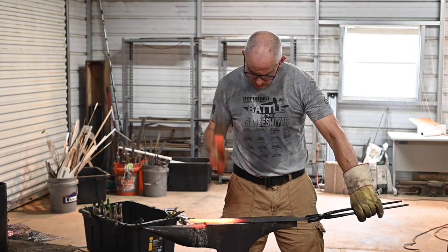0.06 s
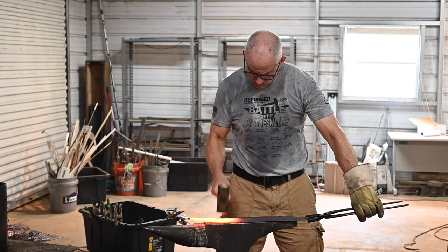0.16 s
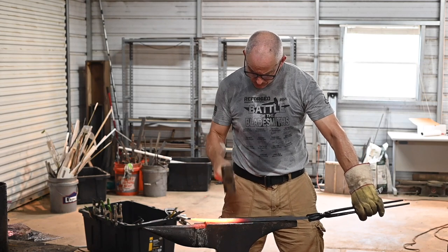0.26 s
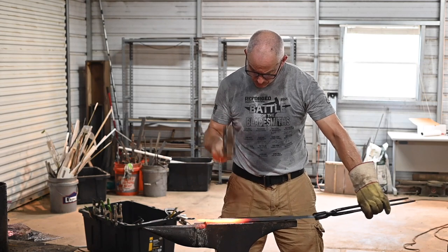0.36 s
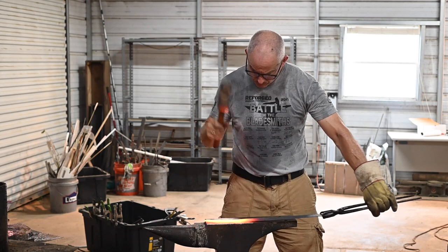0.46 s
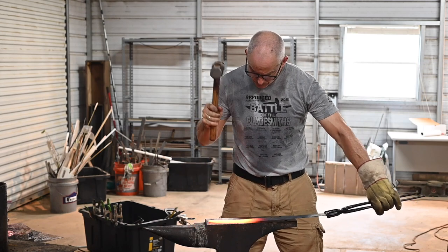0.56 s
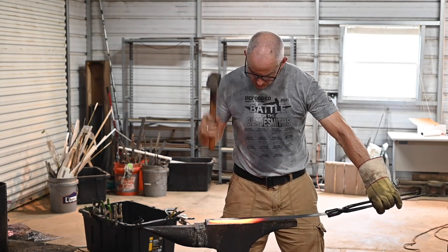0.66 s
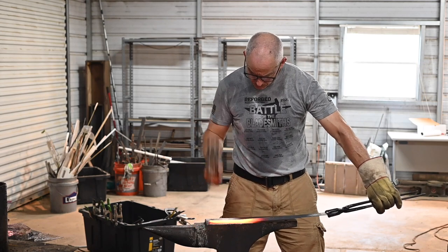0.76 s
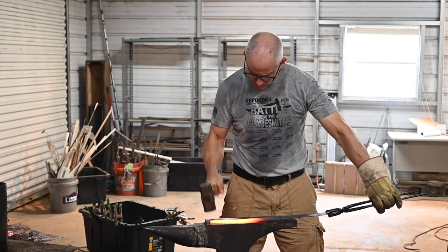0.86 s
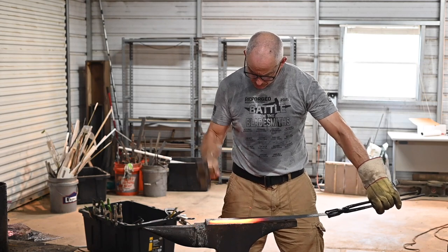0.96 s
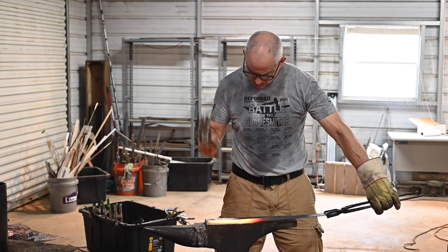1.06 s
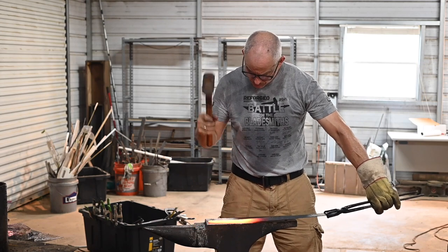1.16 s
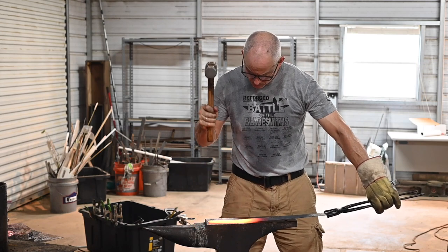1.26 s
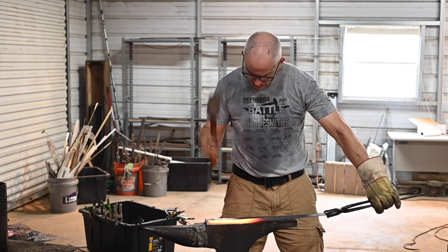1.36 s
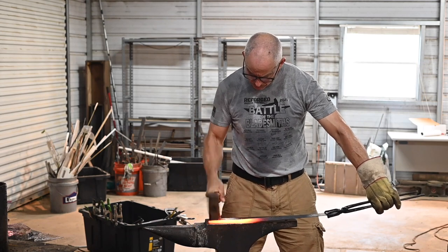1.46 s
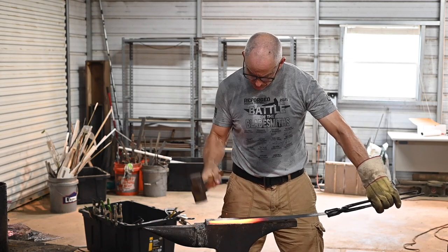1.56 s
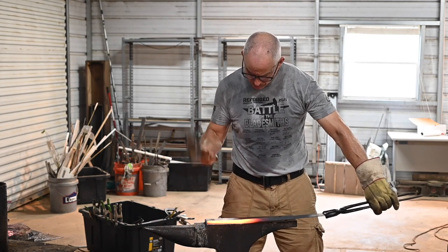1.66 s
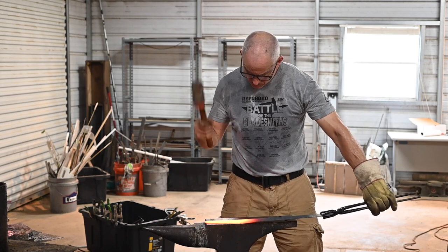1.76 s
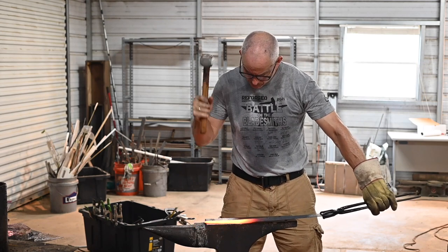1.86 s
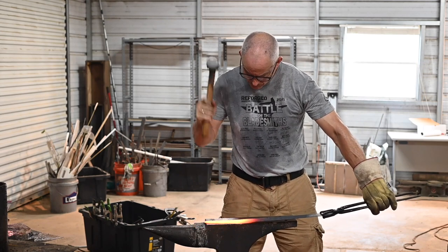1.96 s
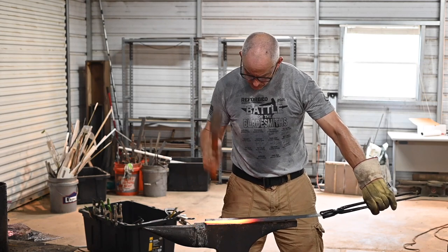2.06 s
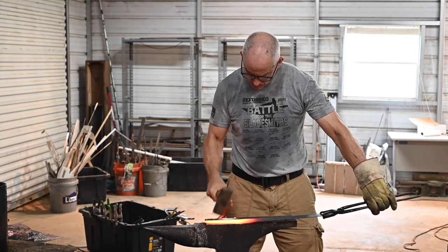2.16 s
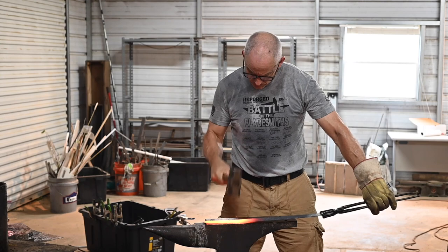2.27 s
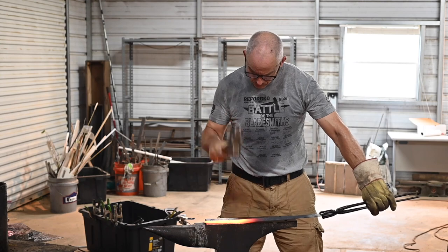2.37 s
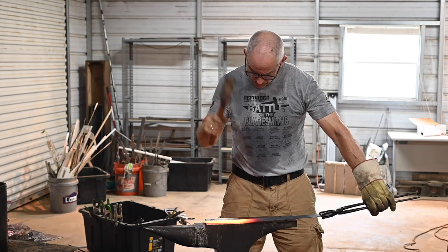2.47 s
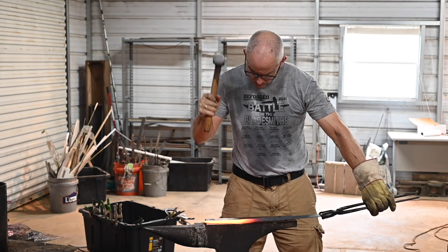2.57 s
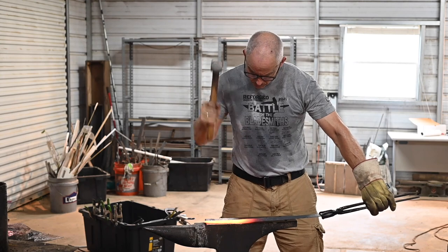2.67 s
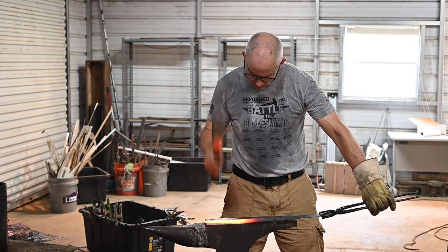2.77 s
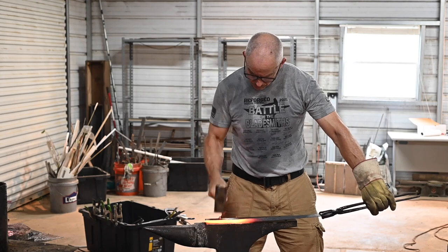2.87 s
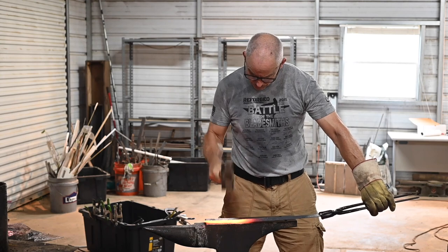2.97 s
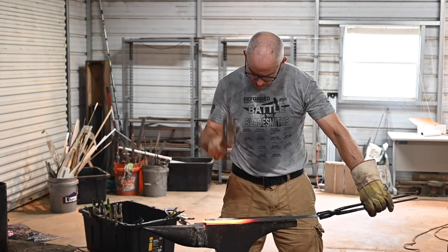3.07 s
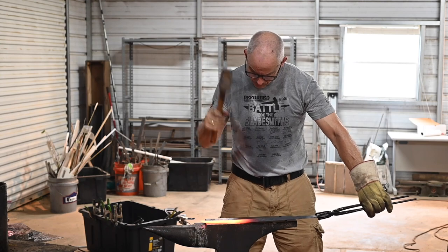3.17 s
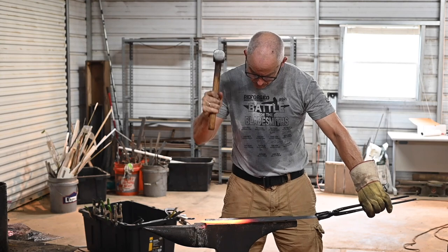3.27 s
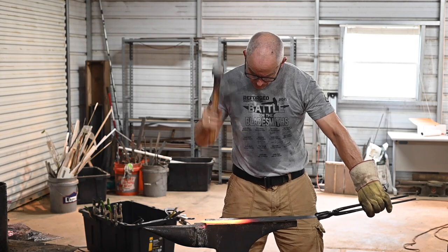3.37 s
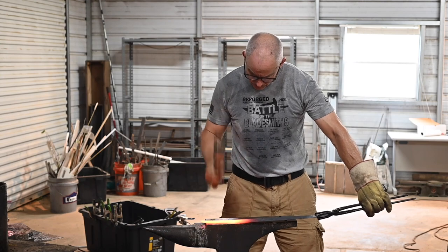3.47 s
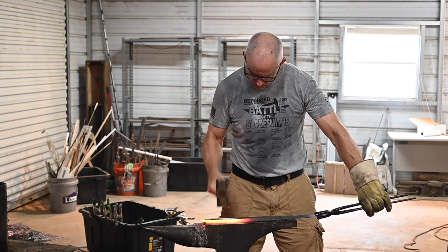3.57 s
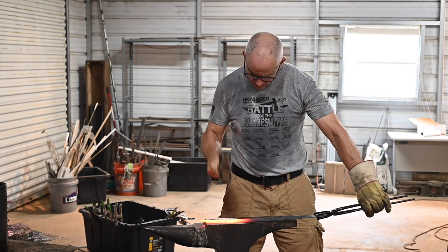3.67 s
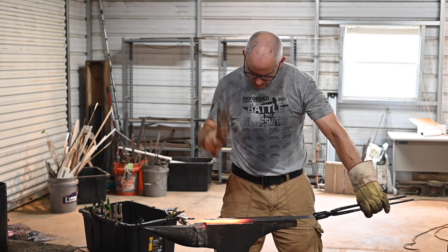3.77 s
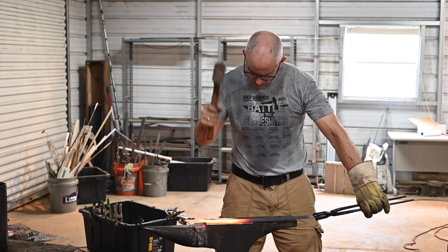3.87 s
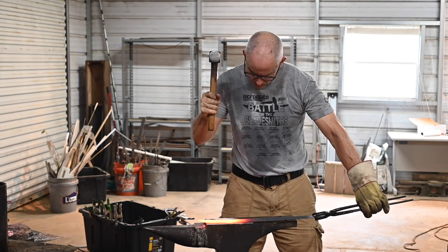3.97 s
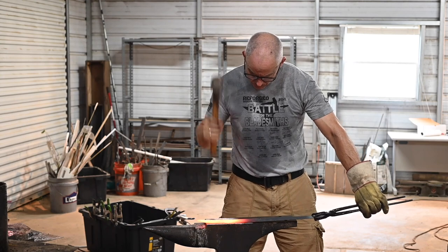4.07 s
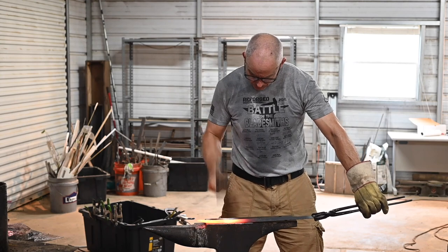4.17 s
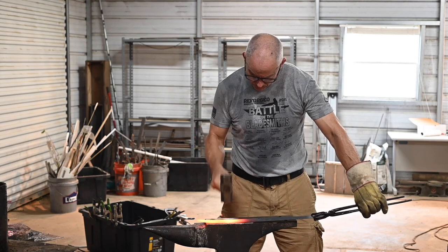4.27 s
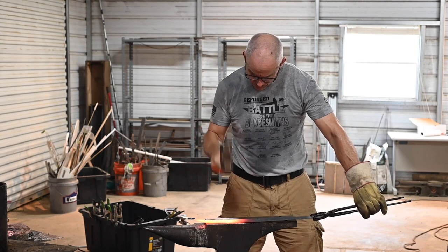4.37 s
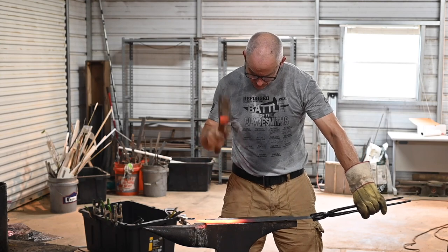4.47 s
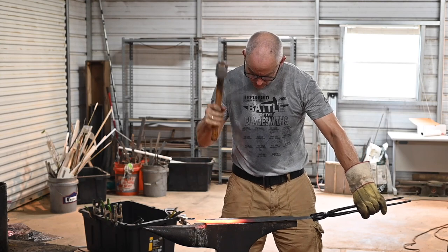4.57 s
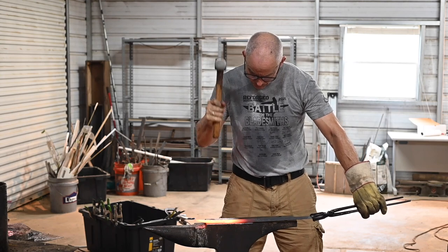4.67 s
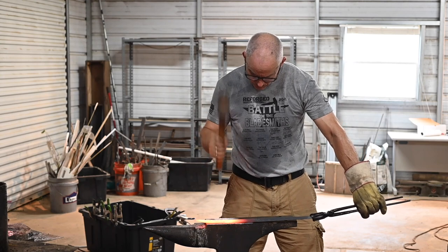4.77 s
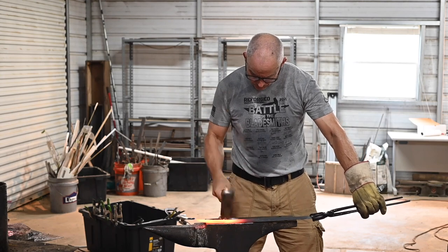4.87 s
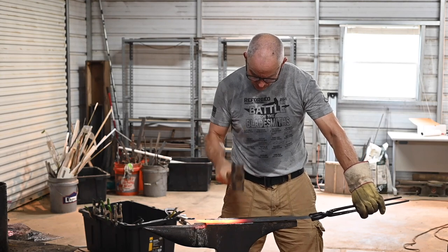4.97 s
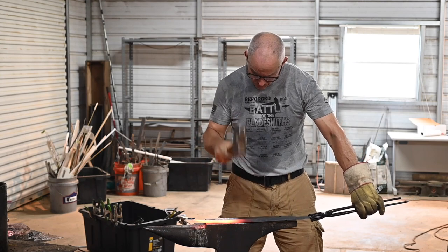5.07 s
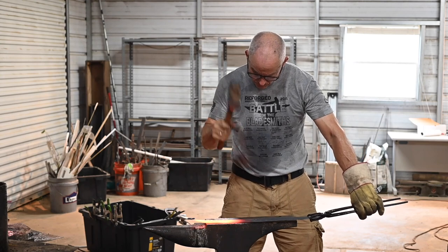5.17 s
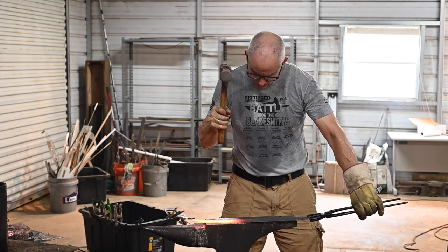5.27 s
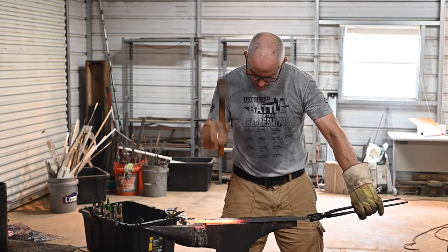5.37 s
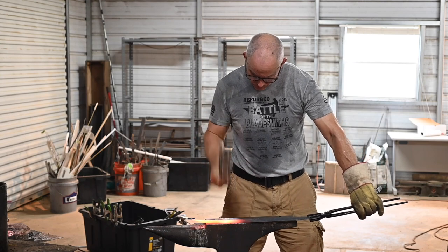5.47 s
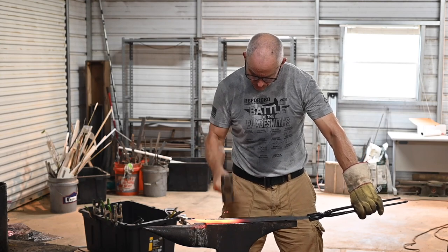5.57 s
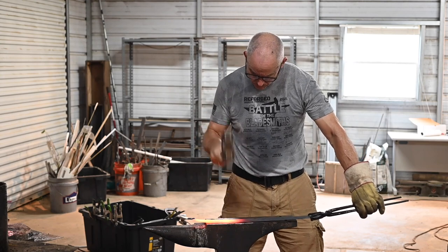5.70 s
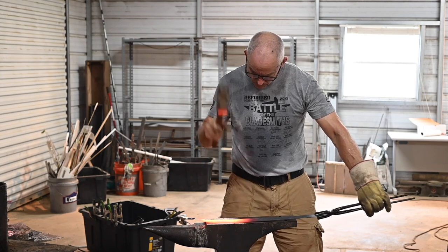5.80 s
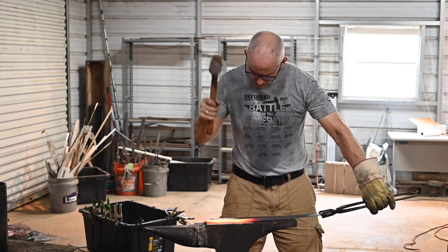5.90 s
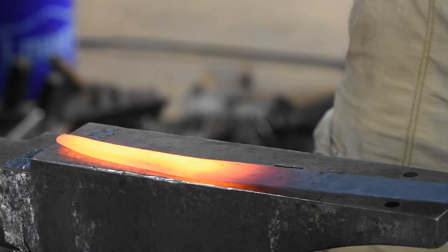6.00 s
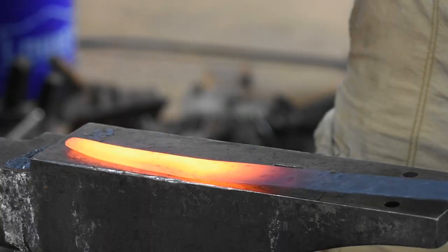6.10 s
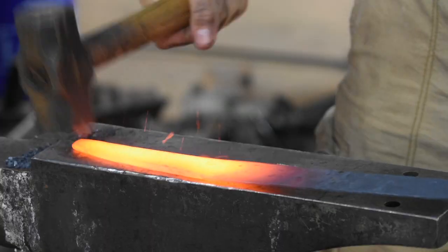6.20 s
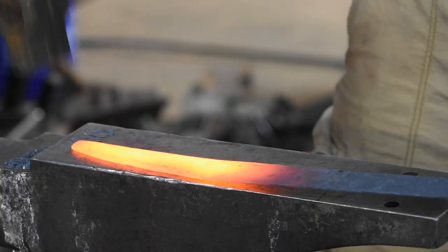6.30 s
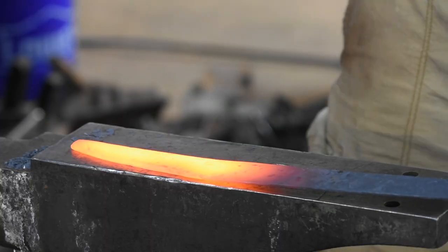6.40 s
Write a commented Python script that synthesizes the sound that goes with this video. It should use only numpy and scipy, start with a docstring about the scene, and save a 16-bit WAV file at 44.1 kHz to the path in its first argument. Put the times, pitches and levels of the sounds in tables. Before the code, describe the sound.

The ring of an earlier blow is already sounding over a soft, low forge rush. Then ten regular hammer blows fall on steel over an anvil, each snapping sharply, thudding briefly and singing on with a wavering bright ring. Metal walls throw back strong early echoes and a long wash. Each new blow chokes the previous note; close, wide stereo pickup, and the final blow is harder.

```python
"""A hand hammer draws out a hot blade on an anvil in a sheet-metal workshop, three blows every two seconds.
A forge rushes low and steady throughout (shaped noise); at first an earlier blow is still ringing.
Each blow: a dry crack (pulse, snap, noise bursts), then a thud of the stand (damped sines).
The anvil sings on, one clear note under many overtones (beating tones), in a long bright wash (decaying noise).
The next blow chokes that ring."""
import sys
import numpy as np
from scipy import signal
from scipy.fft import rfft, irfft, next_fast_len
from scipy.io import wavfile

SR = 44100
rng = np.random.default_rng(int(sys.argv[2]) if len(sys.argv) > 2 else 0)


def file_out(sig):
    """Save sig as 16-bit WAV at sys.argv[1]."""
    # one column per channel
    cols = np.atleast_2d(sig).T
    # limit, then scale
    lim = np.clip(cols, -1, 1)
    pcm = np.round(lim * 32767).astype(np.int16)
    wavfile.write(sys.argv[1], SR, pcm)


N = 283983

# hammer blows, levels re a usual blow: t/s, force/dB, face ping/dB, main note/dB, brightness/dB,
# first twin/dB, second twin/dB
BLOWS = [ (-0.48, 5.5, 0, 3, 1, 1, 4), (0.1883, 0.5, 4, -0.1, 2.1, 5, 4),
         (0.865, 1.5, -18, -0.4, 0, 2.5, 0), (1.5196, 0, -15, 1.3, 1.4, -1, -8),
         (2.1904, 0.5, -8, -2.8, -2.7, -1, -6), (2.8881, 0.5, -5, -0.6, -2.4, 3, 0),
         (3.5675, 0.8, 4, 0.6, -2, -2, -4), (4.2476, 0.7, 6, 0.6, -0.2, -4, 8.5),
         (4.9196, -0.5, 5, 0.4, 1.7, 2, 8.5), (5.5686, -2, 0, 0, 1.8, 0, 10),
         (6.2534, 4, -18, 1.2, -2.8, -2, -3)]
# usual blow: crack, low and high echoes, low overtones
CRACK_DB, KNOCK_DB, CLASH_DB, LOW_RING_DB = -8, 0.5, -0.35, 2.5
KNOCK_DB_PER_DB, CLASH_DB_PER_DB, LOW_RING_DB_PER_DB = 1, 0.086, 0.25  # growth with force

# forge rush: f/Hz, level/dB per Hz
FORGE_SPECTRUM = [(25, -100), (60, -76.5), (120, -71), (220, -66.5), (450, -76), (800, -74), (1150, -79.5),
                  (2000, -71), (5000, -85.5), (9000, -100), (14000, -120)]
# wall echoes before colouring and decay: f/Hz, level/dB per Hz
WASH_SPECTRUM = [(30, -88), (90, -60), (200, -61.5), (450, -70), (800, -63), (1150, -70.5), (1650, -61),
                 (2750, -71.5), (3600, -67.5), (4500, -75), (6000, -71.5), (9000, -73.5), (12000, -76.5),
                 (16000, -68)]
# room decay: f/Hz, t60/s
ROOM_T60 = [(80, 1.06), (250, 1.47), (800, 1.53), (2000, 3.4), (5000, 2.8), (8000, 1.9), (11000, 1),
            (15000, 0.44)]
# damped blade modes that colour the wash: f/Hz, width/Hz, level/dB
BLADE_MODES = [(1364, 34, 0.5), (1660, 67, 1.5), (3292, 73, 12.5), (3374, 140, 4), (4035, 390, 13.5),
               (4900, 180, 16.5), (6770, 120, 11), (10400, 250, 2)]
# room sound: f/Hz, left-right likeness/1
ROOM_LIKENESS = [(150, 0.99), (300, 1), (600, 0.93), (1200, 0.8), (2200, 0.27), (4000, 0.033),
                 (14000, 0.086)]
# direct sound: f/Hz, left-right likeness/1
DIRECT_LIKENESS = [(500, 1), (4000, 0.97), (14000, 0.41)]

# anvil rocking on its stand, levels re force: f/Hz, level/dB, t60/s
STAND_MODES = [(70, -42, 0.17), (102, -19, 0.073), (125.6, -37.5, 0.39), (200.4, -27.5, 0.19),
               (303, -21, 0.052), (610, -26.5, 0.067)]

# anvil and hammer overtones, before balance and scatter:
# f/Hz, level/dB, t60/s, left-right/dB, echo share/1
OVERTONES = [ (1303, -49, 2.5, 0, .8), (1711, -33, 2.5, -1, .55), (1839, -41, 2.3, 0, .6),
             (3262, -43, 6, 0, .8), (3280, -38, 4.2, 1, .7), (3401, -37, 6, -4, .7),
             (3416, -35, 3.6, -3, .7), (3595, -43, 2.5, -4, .3), (4027, -45, 4.5, 1, .8),
             (4166, -40, 5, -2, .6), (4797, -41, 2.5, -1, .4), (4828, -41, 2.6, 2, .4),
             (4894, -39, 2.8, 1, .5), (6711, -33, 2.3, 0, .4), (6820, -42, 1.5, 3, .5),
             (7245, -50, 4, 0, .4), (8032, -50, 1.9, 1, .5), (8290, -50, 2.1, 0, .5),
             (9232, -50, 1.7, 0, .5), (9467, -36.5, 1.7, 8, .3), (10890, -50, 1.9, 1, .6),
             (12042, -51, 1.2, 5, .5), (12744, -41, 1.7, 6, .2), (15423, -56, 1.9, -5, .4)]
# two close modes that beat: first f/Hz, second f/Hz
TWIN_HZ = (5849, 5882)
# fades, rows left then right: level/dB, fall/(dB/s), beat rate/Hz, beat depth/dB, crest t/s
TWIN_FADE = [(-36.6, 1, 1.9, 2.3, 0.37), (-41.5, 3, 1.35, 3.8, 0.1)]  # first twin
UPPER_FADE = [(-31.3, 12.5, 4.1, 4, 0.21), (-30.8, 13, 3.7, 3.5, 0.07)]  # second strong mode
NOTE_FADE = [(-11.1, 34.5, 0.88, 4.9, 0.87), (-14.2, 28.5, 1.52, 3.5, 0.575)]  # main note, beating with the room's standing waves
# quicker beats of the main note, same on both sides: beat rate/Hz, depth/dB, crest t/s
RIPPLES = [(5.15, 1.75, 0.195), (9.57, 1.3, 0.108)]
NOTE_HZ, UPPER_HZ = 1521, 3835  # main bending mode, second strong mode
NOTE_DELAY_S, NOTE_BUILD_S = 0.009, 0.038  # notes arrive by way of the walls and build up
# quick flutter: main note/1, upper note/1
FLUTTER_SHARE = (.13, .22)

# crushed scale, re crack level: f/Hz, level/dB per Hz
CRACK_SPECTRUM = [(200, -58), (600, -46), (1000, -50), (1600, -44), (3000, -46), (6000, -46), (10000, -49),
                  (16000, -50)]
# brief clash, re clash level: f/Hz, level/dB per Hz
CLASH_SPECTRUM = [(100, -63), (500, -55.5), (1100, -58.5), (1600, -44), (2600, -53.5), (3500, -50.5),
                  (5500, -55.5), (10000, -66.5), (16000, -63)]
# first steel contact, same level every blow: median f/Hz, level/dB
SNAP = (8800, 5)
CRACK_T60_S = 0.0018

TOP_HZ = 15900
LENGTH = 2 * SR  # samples per blow
AGE_S = np.arange(LENGTH) / SR  # since the blow


def amp(db):
    """Decibels to gain."""
    return 10 ** (np.asarray(db) / 20)


def fade(t_s, t60_s):
    """Exponential decay, 60 dB down after t60."""
    return 10 ** (-3 * t_s / t60_s)


def along(points, hz):
    """(Hz, value) points interpolated on a log frequency axis."""
    f, v = np.transpose(points)
    return np.interp(np.log(hz + 1), np.log(f + 1), v)


def pan(db):
    """Left and right gains for a level difference, left louder when positive."""
    return amp(np.array([[db], [-db]]) / 2)


def add(track, s, sound):
    """Mix a sound into the track at time s, trimmed to its ends."""
    start = round(s * SR)
    part = sound[:, max(-start, 0):N - start]
    track[:, max(start, 0):][:, :part.shape[1]] += part


def drift(rate_hz, size=LENGTH):
    """Smooth random phasor of rms 1 per channel, rate_hz knots a second."""
    count = int(size * rate_hz / SR) + 2
    knots = rng.standard_normal((2, count)) + 1j * rng.standard_normal((2, count))
    return signal.resample(knots, size, axis=1) / np.sqrt(2)


def noise(spectrum, likeness, size):
    """Stereo noise: mid and side share the spectrum's power to set left-right likeness."""
    m = next_fast_len(size)
    hz = np.fft.rfftfreq(m, 1 / SR)
    turn = np.arccos(np.clip(along(likeness, hz), -1, 1)) / 2
    gain = amp(along(spectrum, hz)) * np.sqrt(SR / 2)
    colour = gain * np.array([np.cos(turn), np.sin(turn)])
    white = rng.standard_normal((2, m))
    mid, side = irfft(rfft(white) * colour, m)[:, :size]
    return np.array([mid + side, mid - side])


def forge():
    """Steady rush of the forge: stationary noise, mostly low."""
    return noise(FORGE_SPECTRUM, ROOM_LIKENESS, N)


def workshop(knock_db, clash_db, first_echo_s=0.0135, early_db=1, early_t60_s=0.32, near_db=-8):
    """Metal walls return the blow: strong early echoes, then a long wash whose treble top dies first."""
    wash = noise(WASH_SPECTRUM, ROOM_LIKENESS, LENGTH)
    hz, t, bands = signal.stft(wash, SR, nperseg=1024)
    blade_db = sum(db / (1 + (2 * (hz - centre) / width) ** 2) for centre, width, db in BLADE_MODES)
    force_db = along([(900, knock_db), (2500, clash_db / 2), (8000, clash_db)], hz)
    colour = amp(blade_db + force_db)[:, None]
    decay = fade(t, along(ROOM_T60, hz)[:, None])
    tail = signal.istft(bands * colour * decay, SR, nperseg=1024)[1][:, :LENGTH]
    arrival = np.where(AGE_S < first_echo_s, amp(near_db), 1)
    return tail * arrival * (1 + amp(early_db) * fade(AGE_S, early_t60_s))


def stand():
    """The blow drives the anvil down on its stand: a few low, quickly damped modes."""
    t = AGE_S[:SR // 2]
    thud = np.zeros(len(t))
    for hz, db, t60_s in STAND_MODES:
        phase = 2 * np.pi * hz * t + rng.uniform(0, 2 * np.pi)
        thud += amp(db) * np.sin(phase) * fade(t, t60_s)
    return np.array([thud, thud]) * (1 - fade(t, 0.015))  # soft onset


def mode(hz, db, t60_s, pan_db, share, flutter_hz=20, build_s=0.0026, scatter_db=2.5):
    """One overtone: a decaying steady tone plus its own fluttering echoes."""
    t = AGE_S[:SR]
    steady = np.exp(1j * (rng.uniform(0, 2 * np.pi) + rng.normal(0, 1.26, (2, 1))))
    echoes = drift(flutter_hz, size=SR)
    field = np.sqrt(1 - share) * steady + np.sqrt(share) * echoes
    build = 1 - np.exp(-t / build_s)
    level = amp(db + rng.normal(0, scatter_db)) * pan(pan_db) * fade(t, t60_s) * build
    return np.sqrt(2) * level * np.real(field * np.exp(2j * np.pi * hz * t))


def beat(rate_hz, depth_db, crest_s):
    """Regular swell and sag of a beating tone, in dB."""
    return depth_db * np.cos(2 * np.pi * rate_hz * (AGE_S - crest_s))


def note(hz, sides, flutter, wander_per_s, lead_rad, turn_rad_s):
    """Strong anvil note carried by the room: wanders more as echoes pile up, sides slip in phase."""
    build = 1 - np.exp(-np.maximum(AGE_S - NOTE_DELAY_S, 0) / NOTE_BUILD_S)
    level = build * amp([db - fall * AGE_S + beat(*beating) for db, fall, *beating in sides])
    right_only = np.array([[0], [1]])
    phase = 2 * np.pi * hz * AGE_S + right_only * (lead_rad + turn_rad_s * AGE_S)
    echoes = 1 + flutter * drift(45) + wander_per_s * AGE_S * drift(8.9)
    return np.sqrt(2) * level * np.real(echoes * np.exp(1j * phase))


def overtones(low_db, high_db, twins_db, ring_db=-0.4):
    """Where the hammer lands sets the balance of the overtones and of two twin modes that beat."""
    first = note(TWIN_HZ[0], TWIN_FADE, flutter=0.25, wander_per_s=0.3, lead_rad=-0.6, turn_rad_s=-1.2)
    ring = amp(twins_db[0]) * first[:, :SR]
    ring += mode(TWIN_HZ[1], twins_db[1] - 41, t60_s=2.2, pan_db=0.5, share=0.24)
    for hz, db, t60_s, pan_db, share in OVERTONES:
        balance_db = along([(4200, low_db), (4800, high_db)], hz)
        ring += mode(hz, ring_db + db + balance_db, t60_s, pan_db, share)
    return ring


def main_note(note_db):
    """The anvil's main bending mode, rippled by quicker beats."""
    ripple_db = sum(beat(*ripple) for ripple in RIPPLES)
    tone = note(NOTE_HZ, NOTE_FADE, FLUTTER_SHARE[0], wander_per_s=0.7, lead_rad=-0.15, turn_rad_s=-1.8)
    return amp(note_db + ripple_db) * tone


def upper_note(low_db):
    """The anvil's second strong mode, beating in its own way."""
    tone = note(UPPER_HZ, UPPER_FADE, FLUTTER_SHARE[1], wander_per_s=0.4, lead_rad=3.8, turn_rad_s=-10.5)
    return amp(low_db) * tone


def choke(ring, gap_s, t60_s):
    """The next blow clamps blade and anvil and damps the old ring."""
    return ring * fade(np.maximum(AGE_S[:ring.shape[1]] - gap_s, 0), t60_s)


def impact(crack_db, ping_db, clash_db, clash_t60_s=0.037, push_db=-7, push_hz=700, face_db=-20,
           face_hz=10450):
    """The hammer stops dead: push of air, steep snap, crushed scale, ping of its face, brief clash."""
    t = np.arange(-SR // 500, SR // 5) / SR
    after = np.maximum(t, 0)
    u = (np.pi * push_hz * t) ** 2
    push = amp(push_db) * (1 - 2 * u) * np.exp(-u)  # starts just before contact
    snap_hz, snap_db = SNAP
    pitch_hz = snap_hz * np.exp(rng.normal(0, 0.25))
    snap = amp(snap_db) * np.cos(2 * np.pi * pitch_hz * after) * fade(after, CRACK_T60_S / 3)
    scale = amp(crack_db) * noise(CRACK_SPECTRUM, DIRECT_LIKENESS, len(t)) * fade(after, CRACK_T60_S)
    ping = amp(face_db + ping_db) * np.sin(2 * np.pi * face_hz * after) * fade(after, 0.019)
    clash = amp(clash_db) * noise(CLASH_SPECTRUM, DIRECT_LIKENESS, len(t)) * fade(after, clash_t60_s)
    return t[0], amp(crack_db) * push + (snap + scale + ping + clash) * (t >= 0)


def scene():
    """All blows over the rush of the forge."""
    out = forge()
    gaps_s = np.diff([row[0] for row in BLOWS], append=np.inf)
    for blow, gap_s in zip(BLOWS, gaps_s):
        s, force_db, ping_db, note_db, bright_db, *twins_db = blow
        # force drives crack, thud and echoes; brightness tips the ring from low to high overtones
        knock_db = KNOCK_DB + KNOCK_DB_PER_DB * force_db
        clash_db = CLASH_DB + CLASH_DB_PER_DB * force_db
        low_db = LOW_RING_DB + LOW_RING_DB_PER_DB * force_db - bright_db
        lead_s, hit = impact(CRACK_DB + force_db, ping_db, clash_db)
        notes = main_note(note_db) + upper_note(low_db)
        add(out, s, workshop(knock_db, clash_db))
        add(out, s, amp(force_db) * stand())
        add(out, s, choke(overtones(low_db, bright_db, twins_db), gap_s, t60_s=0.09))
        add(out, s, choke(notes, gap_s, t60_s=0.016))
        add(out, s + lead_s, hit)
    return out


def limiter(x, ceiling):
    """Peaks are rounded off just under the ceiling."""
    return x / (1 + np.abs(x / ceiling) ** 6) ** (1 / 6)


def record(dry, low_cut_hz=42):
    """The recorder cuts the deep bass, limits the cracks and keeps nothing above TOP_HZ."""
    high_pass = signal.butter(2, low_cut_hz, "highpass", fs=SR, output="sos")
    held = limiter(signal.sosfilt(high_pass, dry), ceiling=1.05)
    m = next_fast_len(N + SR // 2)
    passed = np.fft.rfftfreq(m, 1 / SR) < TOP_HZ
    return irfft(rfft(held, m) * passed, m)[:, :N]


dry = scene()
out = record(dry)
file_out(out)
```